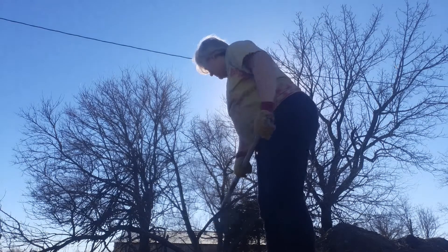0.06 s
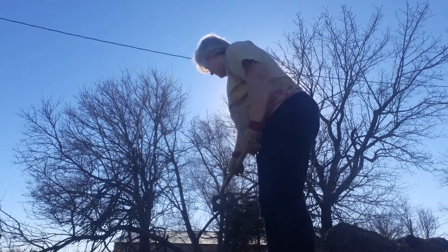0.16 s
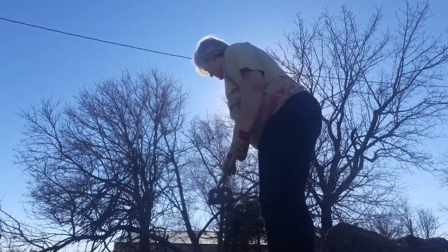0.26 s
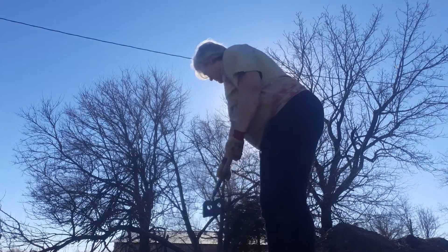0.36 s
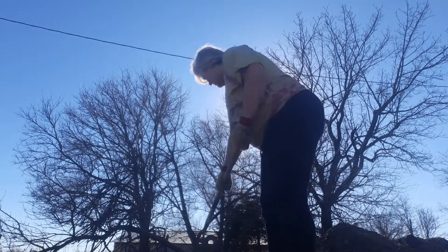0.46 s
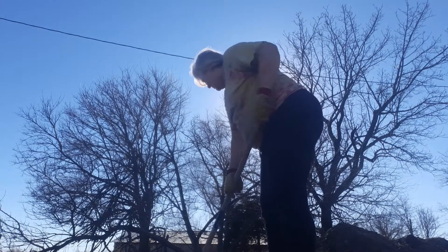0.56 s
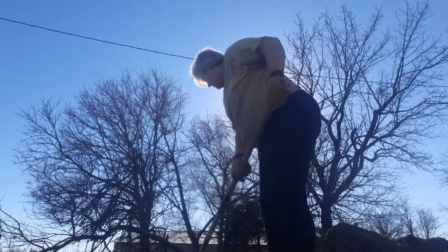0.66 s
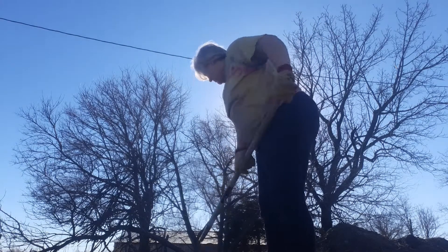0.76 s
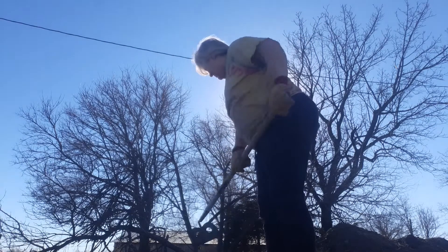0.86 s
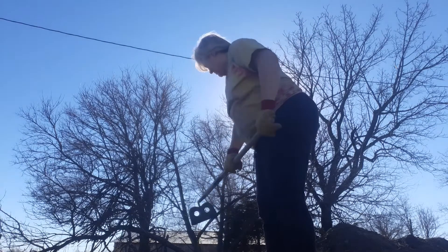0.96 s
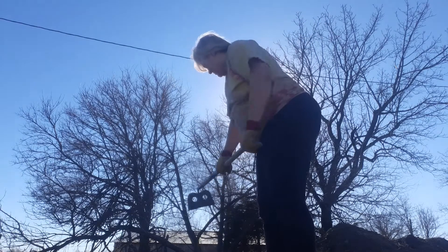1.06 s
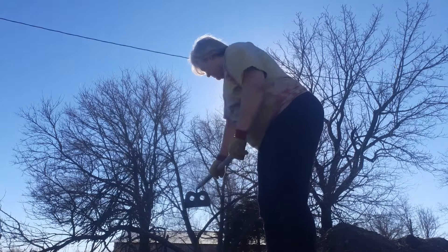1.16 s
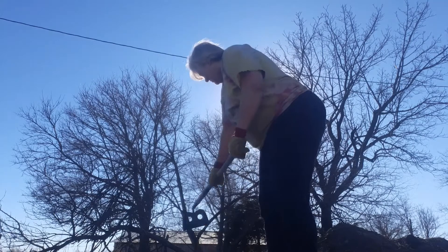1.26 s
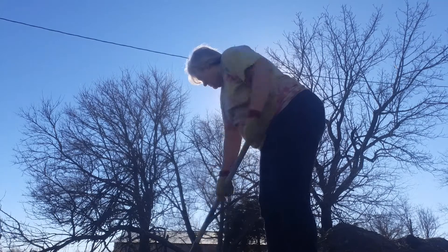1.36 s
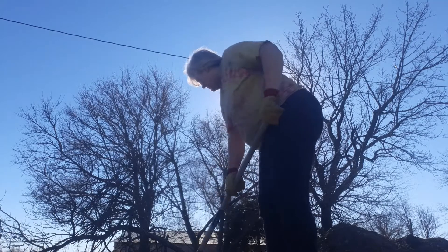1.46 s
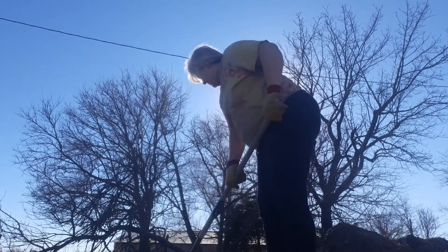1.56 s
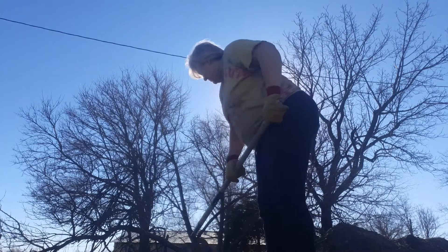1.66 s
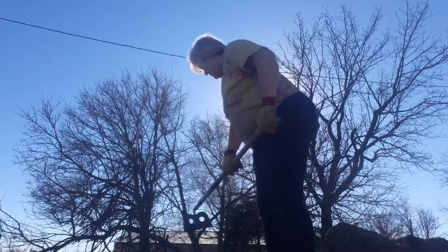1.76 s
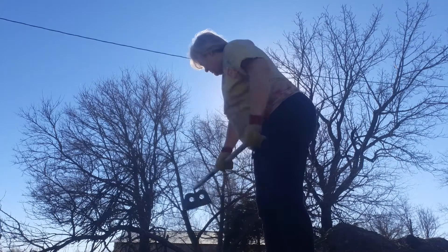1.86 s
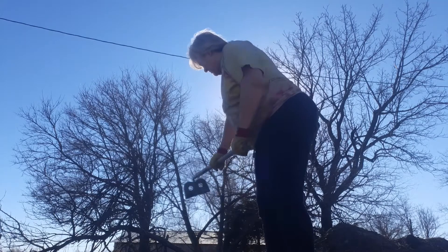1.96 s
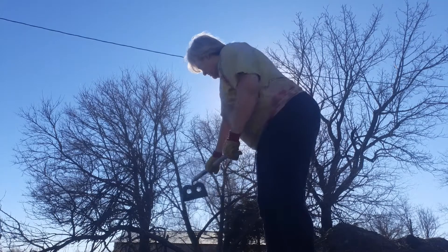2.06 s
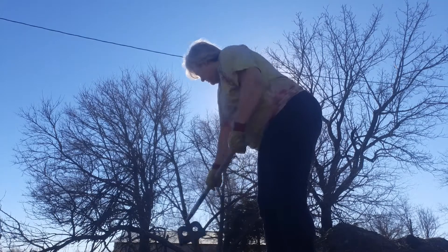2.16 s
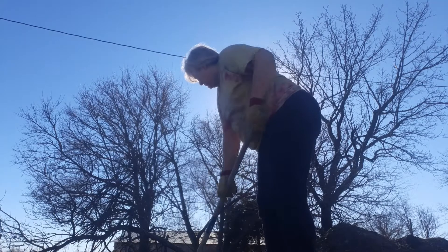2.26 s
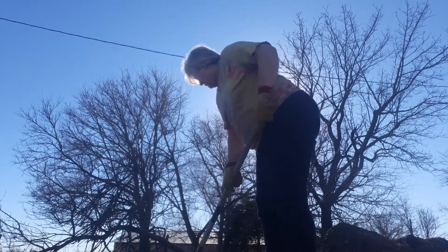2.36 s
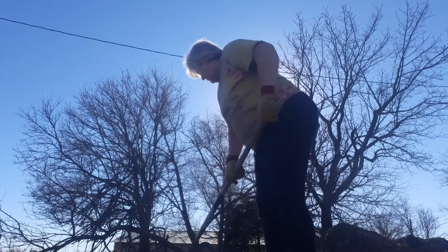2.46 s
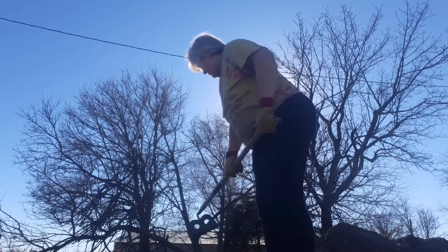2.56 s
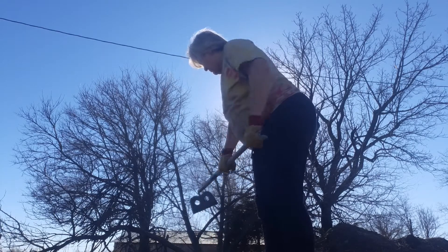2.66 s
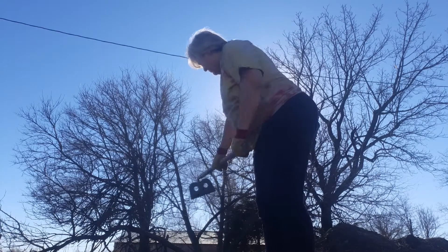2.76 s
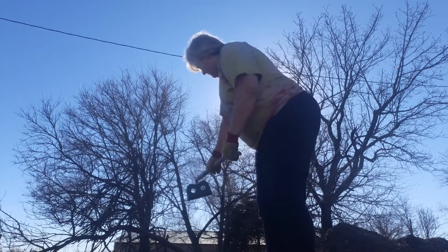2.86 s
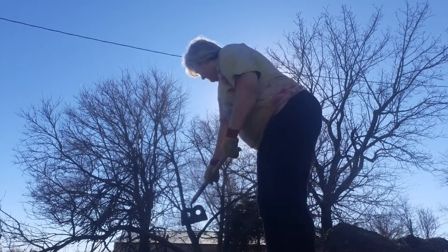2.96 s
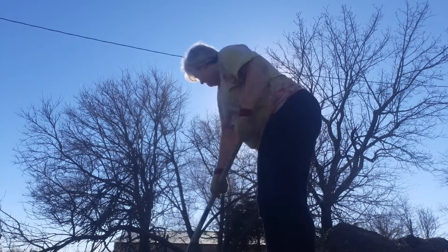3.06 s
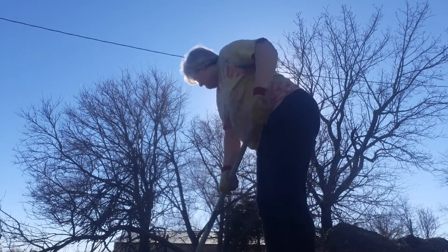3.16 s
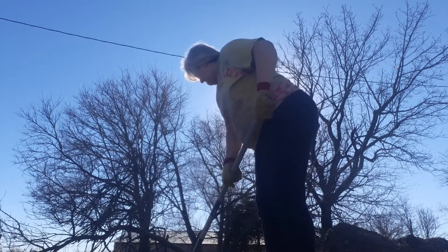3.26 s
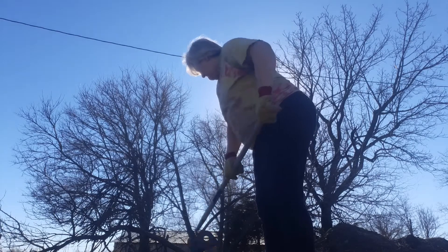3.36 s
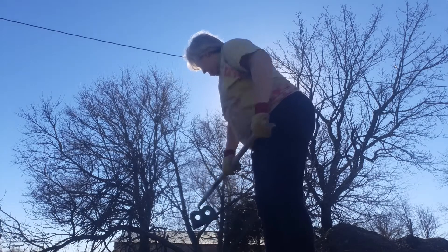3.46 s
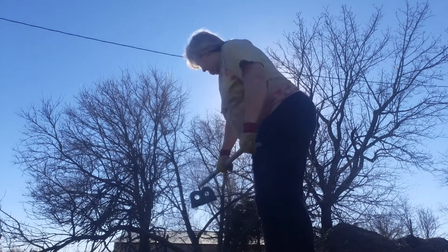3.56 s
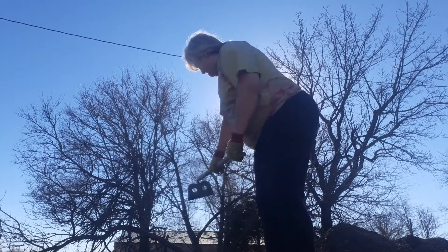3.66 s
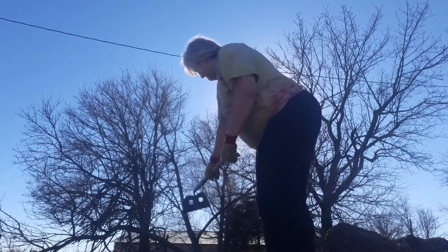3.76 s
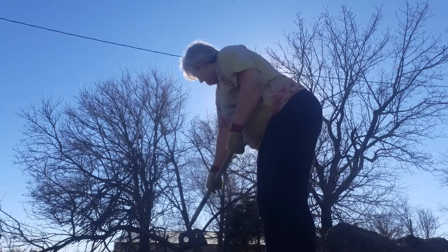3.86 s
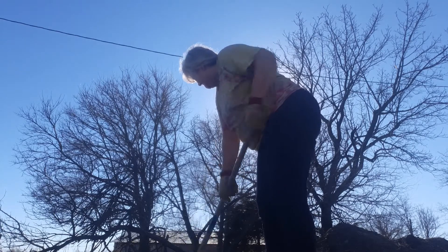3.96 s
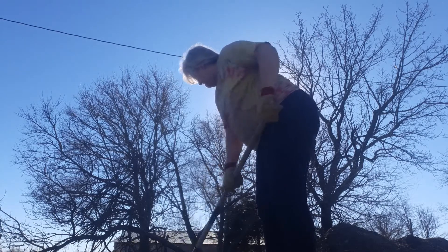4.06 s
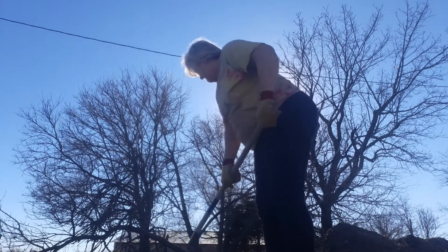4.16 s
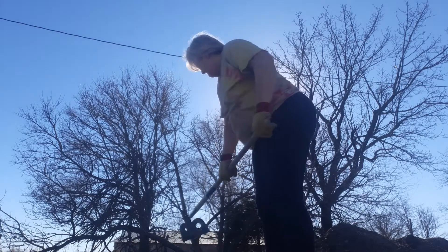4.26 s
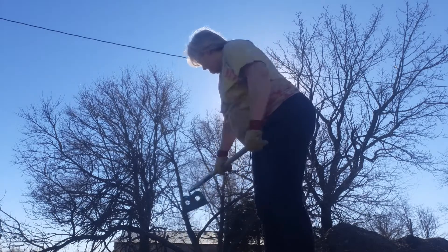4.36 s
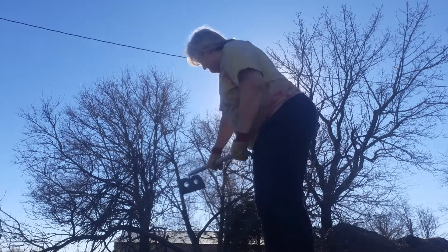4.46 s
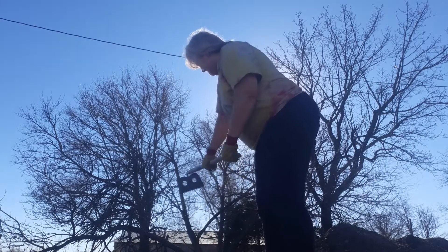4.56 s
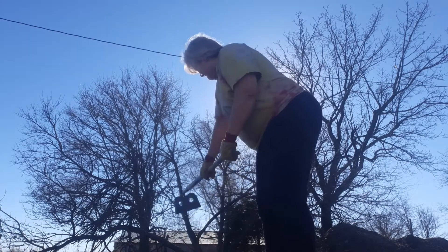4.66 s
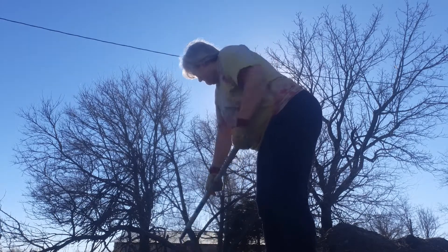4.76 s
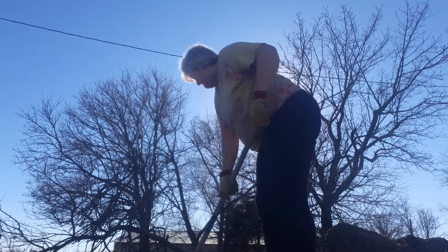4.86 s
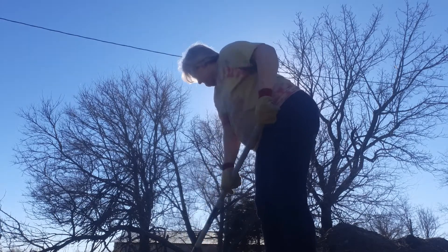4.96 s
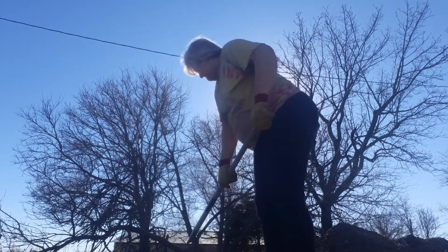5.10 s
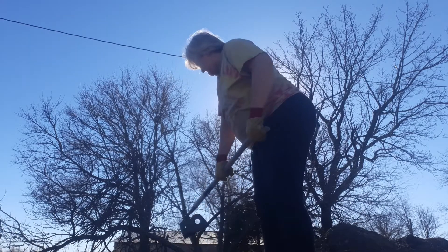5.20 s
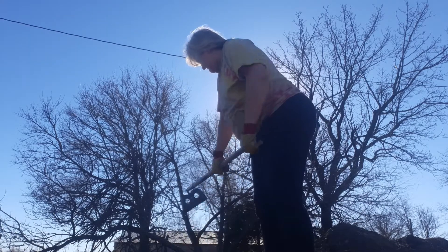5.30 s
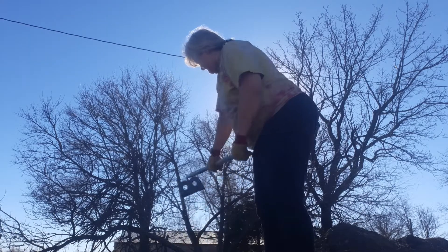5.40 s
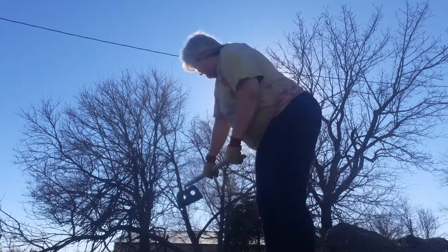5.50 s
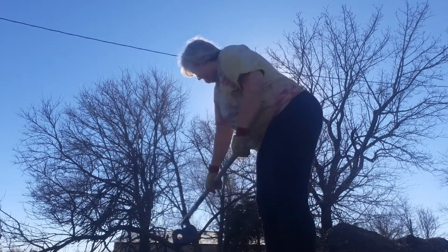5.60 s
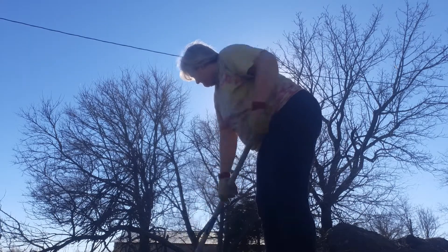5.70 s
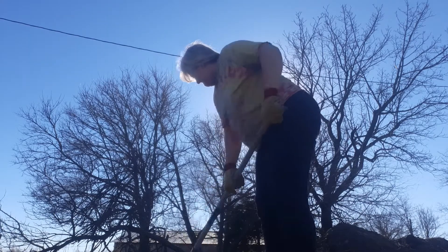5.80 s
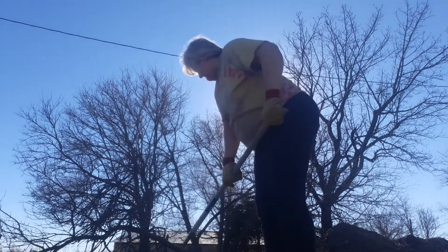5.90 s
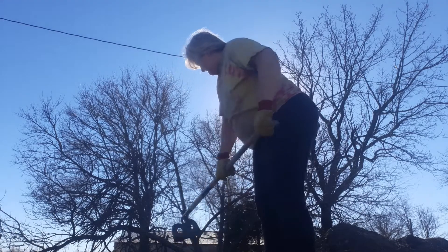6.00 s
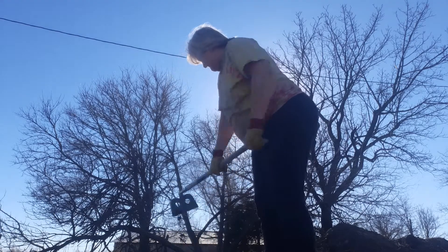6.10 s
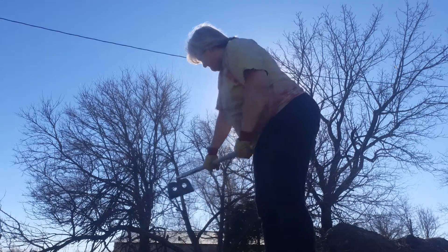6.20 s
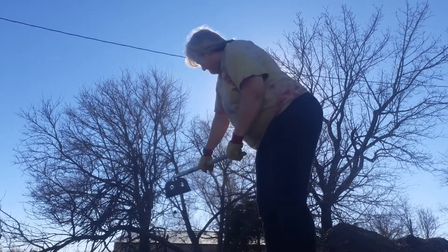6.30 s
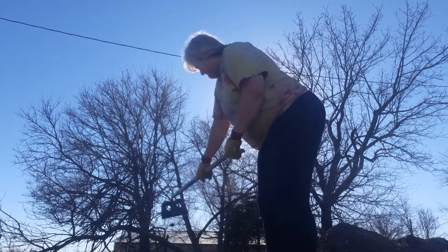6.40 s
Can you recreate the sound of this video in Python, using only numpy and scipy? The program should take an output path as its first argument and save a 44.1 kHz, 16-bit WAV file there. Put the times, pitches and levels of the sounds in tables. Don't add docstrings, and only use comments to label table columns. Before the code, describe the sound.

Close to the ground outdoors, a hoe cuts dry soil seven times, evenly, a little over one chop a second. Each cut is a short gritty crunch with a dull steel ring, knocking lumps and a low falling thump. Between cuts, sand sprays and trickles, pebbles tick brightly and clods drop. The last chop clinks on a stone. Very faint distant rumble and hiss lie beneath.

```python
import sys
import numpy as np
from scipy import signal
from scipy.fft import rfft, irfft, next_fast_len
from scipy.io import wavfile
from scipy.ndimage import uniform_filter1d

SR = 44100
rng = np.random.default_rng(int(sys.argv[2]) if len(sys.argv) > 2 else 0)


def rack_gain(trim_db):
    fader = np.asarray(trim_db, float)
    return 10 ** (fader / 20)


def to_wav(s):
    ch = np.atleast_2d(s).T
    pcm = np.round(np.clip(ch, -1, 1) * 32767)
    wavfile.write(sys.argv[1], SR, pcm.astype(np.int16))


N = 284004
PORT_LAG = 3
CUT_S = 0.17

# enter_s, rise_s, push_held_s, blade_rub_db, crumbling_soil_db
CHOPS = [
    (0.565, 0.024, 0.0045, -43.5, -39),
    (1.418, 0.031, 0.021, -45.5, -43),
    (2.2877, 0.011, 0.034, -44.5, -46),
    (3.121, 0.026, 0.026, -47, -40.5),
    (3.977, 0.02, 0.026, -50.5, -41.5),
    (4.849, 0.028, 0.019, -47, -43),
    (5.7134, 0.01, 0.044, -46, -44),
]
# upper_blade_modes_db, crackle_against_grit_db, finest_sand_db, grit_db, thrown_sand_db
STROKES = [
    (-4.5, -18.5, 2.5, -53.5, -55),
    (-3.5, -16.5, 0.5, -53.5, -57.5),
    (-1.5, -16, 1.5, -49.5, -59),
    (-5.5, -18.5, -3, -52.5, -61.5),
    (-5, -20, -0.5, -52.5, -62.5),
    (-5.5, -16, -2, -50, -63.5),
    (-4, -13, -4, -57, -60),
]
# start_s, peak_db, first_pitch_hz, length_s
GROUND_WAVES = [
    (.586, -31.5, 288, 0.035),
    (1.446, -33, 239, 0.05),
    (2.297, -40, 338, 0.043),
    (3.1463, -28, 283, 0.046),
    (3.997, -43.5, 302, 0.054),
    (4.875, -40.5, 341, 0.054),
    (5.764, -32.5, 169, 0.032),
]
# pitch_hz, width_hz, level_db
BLADE_MODES = [(786.4, 65, -5), (865, 59, -5), (989, 58, -2), (1051, 78, -6), (1304, 60, -7.5),
               (1550, 100, -12.5), (1630, 106, -10.5), (2040, 120, -18.5), (2380, 93, -16.5),
               (2584, 194, -18.5), (3400, 320, -25.5), (3900, 430, -22), (4870, 930, -24.5)]


def in_time(rows):
    s, *columns = np.transpose(sorted(map(tuple, rows)))
    return [np.interp(np.arange(N) / SR, s, column) for column in columns]


def at_hz(points, hz):
    point_hz, value = np.transpose(points)
    return np.interp(np.log(hz), np.log(point_hz), value)


def rms_one(x):
    return x / np.sqrt(np.mean(x ** 2) + 1e-20)


def evened(x, window_s):
    level = np.sqrt(uniform_filter1d(x ** 2, round(window_s * SR)) + 0.27)
    return rms_one(x / level ** 0.36)


def pan(x, balance_db, lag=0):
    left = x * rack_gain(balance_db / 2)
    right = np.roll(x, lag) * rack_gain(-balance_db / 2)
    return np.array([left, right])


def below(x, hz, order=2):
    return signal.sosfiltfilt(signal.butter(order, hz, fs=SR, output="sos"), x)


def drift(rate):
    steps = rng.standard_normal(2000)
    return np.interp(np.arange(N) / SR * rate, np.arange(2000), steps)


def grains(per_s, spread_db):
    sizes = rack_gain(spread_db * np.minimum(rng.exponential(1, N), 5))
    signs = rng.choice([-1, 1], N)
    struck = rng.random(N) < per_s / SR
    return rms_one(sizes * signs * struck) + 1e-18


def ring(clicks, hz, t60):
    r, w = rack_gain(-60 / (t60 * SR)), 2 * np.pi * hz / SR
    return signal.lfilter([0, np.sin(w)], [1, -2 * r * np.cos(w), r * r], clicks + 1e-18)


def body(drive, modes):
    out = 0
    for k, (hz, width, level_db) in enumerate(modes):
        r = np.exp(-np.pi * width / SR)
        zeros = [(1 - r * r) / 2, 0, (r * r - 1) / 2]
        poles = [1, -2 * r * np.cos(2 * np.pi * hz / SR), r * r]
        out = out + (-1) ** k * rack_gain(level_db) * signal.lfilter(zeros, poles, drive)
    return rms_one(out)


def coloured(mid, side, spectrum, likeness, balance=((1, 0), (2, 0))):
    size = next_fast_len(N)
    hz = np.maximum(np.arange(size // 2 + 1) * SR / size, 1)
    alike = np.clip(at_hz(likeness, hz), 0, 1)
    gain = rack_gain(at_hz(spectrum, hz))
    tilt = rack_gain(at_hz(balance, hz) / 2)
    m = rfft(mid, size) * np.sqrt(1 + alike)
    s = rfft(side, size) * np.sqrt(1 - alike)
    out = irfft(gain * np.array([(m + s) * tilt, (m - s) / tilt]), size)[:, :N]
    return out / np.std(out.mean(axis=0))


def summed_db(rest_db, *levels_db):
    power = sum((rack_gain(level) ** 2).sum(axis=0) for level in levels_db)
    return 10 * np.log10(rack_gain(rest_db) ** 2 + power)


def swell_db(middle, half, top_db):
    edge_db, squareness = 10, 1.56
    away = np.abs(np.arange(0, N, 32) / SR - np.array(middle)[:, None]) / np.array(half)[:, None]
    loss_db = np.minimum(edge_db * away ** squareness, 200)
    total = summed_db(-200, np.array(top_db)[:, None] - loss_db)
    return np.repeat(total, 32)[None, :N]


def stroke_db(top_db, fall_db_per_s, hold_share=1):
    attack_db = 36
    enter, rise, hold = np.array(CHOPS).T[:3, :, None]
    t = np.arange(0, N, 8) / SR - enter - rise
    attack_loss = attack_db * np.maximum(-t / rise, 0)
    release_loss = fall_db_per_s * np.maximum(t - hold_share * hold, 0)
    loss_db = np.minimum(attack_loss + release_loss, 200)
    return np.repeat(summed_db(-200, np.array(top_db)[:, None] - loss_db), 8)[None, :N]


def per_chop(values, rest):
    rows = [(0, rest)]
    for (s, *_), value in zip(CHOPS, values):
        rows += [(s - 0.02, rest), (s - 0.01, value), (s + CUT_S - 0.07, value), (s + CUT_S, rest)]
    return in_time(rows)[0]


def background():
    # time_s, level_db
    rumble_level = [(0, -70), (.5, -74), (.95, -69), (1.2, -71.5), (1.7, -71), (2.1, -69.5), (2.5, -67),
                    (2.95, -65.5), (3.4, -63.5), (3.7, -69), (4.2, -65.5), (4.4, -71), (4.7, -70),
                    (5.0, -67.5), (5.2, -69.5), (5.5, -70.5), (6.0, -73), (6.44, -71.5)]
    # pitch_hz, level_db per Hz
    rumble_spectrum = [(15, -75.5), (25, -33), (41, -14), (66, 3.5), (78, 5.5), (88, -1), (103, -5),
                       (178, -14), (310, -26), (360, -37), (400, -58), (520, -59), (880, -120)]
    # pitch_hz, level_db per Hz
    hiss_spectrum = [(120, -30), (200, -6.5), (612, -11), (867, -15), (1210, -17.5), (2380, -20.5),
                     (4000, -24.5), (5940, -28.5), (7270, -31), (8580, -27.5), (9750, -26), (12600, -20.5),
                     (15100, -20.5), (16000, -25)]
    # pitch_hz, likeness (0 to 1)
    likeness = [(60, 0.87), (130, 0.99), (290, 0.044), (640, 0.13), (1410, 0.061), (3100, 0.07),
                (6820, 0.11), (15000, 0.06)]
    shake_lag_s, shake_half_s, shake_db = 0.15, 0.17, -29.5
    white = rng.standard_normal((4, N))
    s, peak_db = np.transpose(GROUND_WAVES)[:2]
    murmur_db = shake_db + 0.23 * (peak_db - peak_db.mean()) + peak_db.mean()
    shaken_db = swell_db(s + shake_lag_s, shake_half_s + 0 * s, murmur_db)
    level_db = summed_db(in_time(rumble_level)[0], shaken_db)
    far = coloured(white[0], white[1], rumble_spectrum, likeness, [(60, 0.63), (400, 2.0)])
    hiss = coloured(white[2], white[3], hiss_spectrum, likeness)
    return rack_gain(level_db + 6.0 + 1.6 * drift(19)) * far + rack_gain(-81.5 + 0.51 * drift(12)) * hiss


def swish(swish_db):
    # pitch_hz, width_hz, level_db
    brush_modes = [(1540, 130, 2), (1773, 1350, 0), (2250, 850, -0.5)]
    mid = body(grains(3000, spread_db=3.5), brush_modes)
    side = body(grains(4100, spread_db=-0.5), brush_modes)
    return rack_gain(swish_db + 1.09 * drift(28)) * (mid + 0.51 * side * [[1], [-1]])


def grit(grit_db):
    # pitch_hz, level_db per Hz
    spray_spectrum = [(1470, -11.5), (2500, -15), (3230, -20.5), (4020, -18.5), (4880, -24.5), (5440, -20),
                      (6300, -17.5), (8460, -3), (9580, -4.5), (10900, -1), (11700, 1.5), (15200, -4),
                      (16000, -9)]
    # pitch_hz, left_over_right_db
    port_balance = [(2500, 1.5), (4400, -1.5), (7000, 5.5), (8500, 10), (10200, -4), (12800, 4.5),
                    (15000, 3)]
    clumps = rms_one(rack_gain(2.0 * drift(400) + 2.0 * drift(60)))
    mid, side = grains(7000, spread_db=0.5), grains(9500, spread_db=5.5)
    spray = coloured(mid, side, spray_spectrum, [(2000, 0.17), (8000, 0.074)], port_balance)
    coarse = below(spray, 10500)
    chop = np.searchsorted(np.array(CHOPS)[1:, 0], np.arange(N) / SR)
    finest_db = np.array(STROKES)[chop, 2]
    return rack_gain(grit_db) * (coarse + rack_gain(finest_db) * (spray - coarse)) * clumps


def trickle(coarse_db):
    # pitch_hz, width_hz, level_db
    rolling_modes = [(8720, 1000, 7), (7720, 630, -10.5)]
    rolling = body(grains(1500, spread_db=4.0), rolling_modes)
    return pan(rack_gain(coarse_db + 4.7 * drift(50)) * rolling, 10.0, PORT_LAG)


def blade(rub_db):
    soft = signal.butter(2, 3500, fs=SR, output="sos")
    ringing = evened(body(signal.sosfilt(soft, grains(2500, spread_db=2.5)), BLADE_MODES), 0.02)
    lower = below(ringing, 1850)
    near = lower + rack_gain(per_chop(np.array(STROKES)[:, 0], rest=0)) * (ringing - lower)
    lowest = below(ringing, 900, order=4)
    near = near + (rack_gain(per_chop(np.zeros(len(STROKES)), rest=9)) - 1) * lowest
    wide = body(signal.sosfilt(soft, grains(2500, spread_db=6.0)), BLADE_MODES)
    slip = rack_gain(rub_db + 2.0 * drift(150))
    return pan(slip * near, 1.0, PORT_LAG) + slip * rack_gain(-12) * wide * [[1], [-1]]


def pebbles():
    # start_s, peak_db, left_over_right_db, pitch_hz
    pebble_hits = [(0.117, -58, 15, 8800), (0.706, -40, 5, 10500), (0.988, -46, 3, 12000),
                   (1.043, -64, 20, 8560), (1.223, -57, 11, 8800), (1.679, -60, 7, 8500),
                   (1.705, -54, 11, 8150), (1.721, -47.5, 12.5, 8600), (1.734, -47.5, 14, 9400),
                   (1.75, -48, 6, 9700), (1.7635, -50, 14, 12100), (2.396, -38.5, 7, 8040),
                   (2.6833, -57, 4.5, 11000), (3.812, -59.5, 12, 8750), (3.849, -57, 7, 9100),
                   (3.8775, -58, 8, 8240), (4.886, -34.5, -3, 11000), (5.801, -44, 11.5, 11300),
                   (5.938, -61, 13, 8700), (5.993, -67, 15, 8400), (6.022, -57, 13, 8640),
                   (6.045, -51, 8, 8880), (6.146, -61, 21, 11900), (6.2237, -52.5, 7, 9600),
                   (6.27, -59, 10.5, 8730), (3.9845, -41, 12, 8440), (2.724, -60, 15, 8900),
                   (4.108, -59, 15, 8300), (1.2225, -62, 7, 12500), (1.164, -66, 9, 8500),
                   (6.149, -55, 11, 9300)]
    out = np.zeros((2, N))
    chance = rng.uniform(-1.05, 1, (len(pebble_hits), 3))
    t = np.arange(round(0.02 * SR)) / SR
    envelope = (1 - np.exp(-t / 0.00021)) * rack_gain(-60 * t / 0.0069)
    for (s, peak_db, side_db, hz), detune in zip(pebble_hits, chance):
        pitches = hz * (np.array([0.88, 1, 1.18]) + 0.091 * detune)
        tick = np.sin(2 * np.pi * np.outer(t, pitches)) @ [0.4, 1, 0.5] * envelope
        out[:, round(s * SR):][:, :len(t)] += pan(rack_gain(peak_db - 1.5) * tick, side_db, PORT_LAG)
    return out


def soil(crumble_db):
    # pitch_hz, width_hz, level_db
    shaft_modes = [(212, 122, 2), (323.6, 64, 6), (377, 78.4, 1.5), (477, 48.5, -2)]
    knocks = signal.lfilter([0.1], [1, -0.9], grains(400, spread_db=3.0))
    lumps = evened(body(knocks, shaft_modes), 0.044)
    late_db = np.roll(crumble_db, round(0.0032 * SR))
    return pan(rack_gain(late_db) * lumps, 2.2, PORT_LAG)


def crackle(grit_db):
    # pitch_hz, width_hz, level_db
    crust_modes = [(3370, 1080, -1.5), (4290, 650, -0.5), (5240, 1600, -5.5), (6430, 440, 0.5)]
    mid, side = (body(body(grains(3000, spread_db=3.5), crust_modes), [(4580, 7300, 0)]) for port in range(2))
    level = rack_gain(grit_db + per_chop(np.array(STROKES)[:, 1], rest=-36))
    return level * (mid + 0.85 * side * [[1], [-1]])


def clods():
    # start_s, peak_db, pitch_hz, t60_s
    clods_and_crumbs = [(0.5943, -39.5, 303, 0.014), (0.567, -58, 1500, .01), (.589, -53, 3900, 0.027),
                        (0.636, -49, 296, .02), (1.2225, -73, 2010, .008), (1.446, -35, 403, 0.015),
                        (1.466, -48, 4000, 0.011), (1.479, -51, 3400, .012), (2.298, -37, 415, 0.018),
                        (2.758, -69.5, 770, 0.043), (3.149, -40, 370, 0.018), (3.163, -62, 5200, 0.022),
                        (3.168, -58, 3970, .02), (3.174, -58, 4740, .02), (3.2, -66, 4400, .015),
                        (4.015, -65, 4540, .02), (4.008, -37, 240, 0.024), (4.029, -34, 300, 0.018),
                        (4.872, -35.5, 420, 0.038), (4.875, -45, 240, 0.034), (4.895, -36, 210, 0.045),
                        (5.0095, -57.5, 950, 0.039), (5.0095, -73, 1810, .012), (5.23, -52, 835, 0.008),
                        (5.233, -56, 556, 0.0074), (5.236, -50, 390, 0.019), (5.244, -53.5, 370, 0.015),
                        (5.25, -59, 700, 0.012), (5.218, -69, 2000, .012), (5.717, -53, 430, 0.019),
                        (5.737, -41.5, 450, 0.081), (5.742, -47, 2510, .015), (5.772, -34, 235, 0.017),
                        (5.8, -39, 970, 0.02), (6.021, -76.5, 1060, .043), (6.147, -71.5, 1740, .02),
                        (6.223, -66, 2210, 0.006), (6.222, -69, 1100, .006), (6.235, -66, 1630, 0.04),
                        (6.236, -64, 785, 0.01),
                        (0.5798, -48, 1000, .02), (.582, -48, 1660, .015), (.606, -48.5, 480, .03),
                   (.612, -52, 1620, .02), (1.417, -66, 2600, .03), (1.439, -55, 2500, .03),
                   (3.15, -44, 300, .025), (1.449, -43, 268, .025), (1.468, -51, 3400, .01),
                   (2.2935, -48, 940, .02), (2.301, -48, 251, .02), (2.314, -49, 228, .025),
                   (4.009, -41, 900, .008), (4.069, -56, 1400, .008), (4.873, -58.5, 2550, .025),
                   (4.886, -47, 200, .03), (4.887, -61, 2000, .02), (5.03, -65, 850, .02),
                   (5.05, -70, 900, .02), (5.72, -53, 2550, .02), (5.752, -52, 2580, .015),
                   (5.76, -53, 1720, .012), (5.764, -50, 2520, .015), (5.778, -54, 1600, .015),
                   (6.236, -69, 2250, .012)]
    # start_s, peak_db, pitch_hz, t60_s
    sand_specks = [
        (0.9868, -53, 11800, 0.005),
        (1.0427, -62, 8480, 0.005),
    ]
    # start_s, peak_db, pitch_hz, t60_s
    late_sand_specks = [
        (5.0603, -60, 8590, 0.005),
        (5.1157, -61, 8580, 0.005),
        (5.198, -62, 8640, 0.005),
        (5.3287, -71, 8740, 0.005),
    ]
    out = np.zeros(N)
    soft = 1 - np.exp(-np.arange(round(0.1 * SR)) / SR / 0.00063)
    for s, peak_db, hz, t60 in [*clods_and_crumbs, *sand_specks, *late_sand_specks]:
        click = np.zeros(len(soft))
        click[0] = rack_gain(peak_db + 3.5)
        dull = ring(click, hz, t60) + 0.47 * ring(click, hz * 2.1, t60 * 0.17)
        out[round(s * SR):][:len(click)] += soft * dull
    return pan(out, 1.5, PORT_LAG)


def jolts():
    # start_s, peak_db, main_mode_hz
    catches = [(0.58, -29, 985), (0.581, -44, 1630), (0.591, -28.5, 966), (.593, -45, 1630),
               (0.611, -54, 870), (.612, -48, 1550), (.636, -38, 970), (.65, -42, 980), (0.659, -42, 980),
               (0.677, -58, 990), (1.417, -62, 2580), (1.439, -45, 2546), (1.451, -48, 2450),
               (1.437, -30.5, 1025), (1.443, -26, 918), (1.445, -38, 1620), (1.452, -31.5, 1010),
               (1.468, -36.5, 1480), (1.472, -35, 975), (1.48, -45, 1000), (2.294, -39, 926),
               (2.301, -34.5, 805), (2.305, -41, 2580), (2.31, -39, 1310), (2.314, -32, 970),
               (2.322, -40, 866), (2.33, -38, 994), (2.348, -40.5, 1634), (2.354, -40, 1050),
               (2.368, -52, 1020), (3.14, -38, 990), (3.146, -26.5, 992), (3.148, -45, 1550),
               (3.169, -40, 866), (3.185, -49, 1570), (3.188, -48, 885), (3.986, -62, 930),
               (3.998, -35, 974), (4.0, -43.5, 2540), (4.007, -36, 1330), (4.008, -35, 845),
               (4.029, -59, 900), (4.041, -55, 990), (4.052, -57, 1010), (4.067, -50.5, 985),
               (4.865, -36, 1006), (4.874, -28, 1004), (4.874, -38, 1280), (4.883, -30, 823),
               (4.883, -51, 2040), (4.903, -57, 1600), (4.905, -39, 1010), (5.718, -31, 1004),
               (5.729, -37, 1230), (5.736, -26.5, 962), (5.744, -39, 890), (5.757, -40.5, 970),
               (5.774, -32, 817)]
    rise_s, main_db, others_db = 0.0034, -6.5, -13
    out, hits = np.zeros(N), np.array(catches)
    at = np.round(hits[:, 0] * SR).astype(int)
    chance = rng.standard_normal((len(hits), 2 * len(BLADE_MODES)))
    hardness_db = per_chop(np.array(STROKES)[:, 0], rest=0)[at]
    for k, (hz, width, level_db) in enumerate(BLADE_MODES):
        clicks = np.zeros(N)
        scatter_db = 3 * chance[:, 2 * k]
        hit_db = hits[:, 1] + level_db + others_db + scatter_db + hardness_db * (hz > 1850)
        clicks[at] = rack_gain(hit_db) * np.sign(chance[:, 2 * k + 1])
        out += ring(clicks, hz, 2.8 / width)
    t = np.arange(round(0.05 * SR)) / SR
    chatter = (t / rise_s * np.exp(1 - t / rise_s)) ** 2
    for start, (s, peak_db, hz) in zip(at, catches):
        out[start:][:len(t)] += chatter * rack_gain(peak_db + main_db) * np.sin(2 * np.pi * hz * t)
    soft_contact = signal.butter(2, [650, 2800], "band", fs=SR, output="sos")
    return pan(signal.sosfilt(soft_contact, out), 0.95, PORT_LAG)


def ground():
    last_hz, glide_share = 79.5, 0.2415
    sway_hz, sway_db, sway_t60 = 64.94, -15, 0.71
    out = np.zeros(N)
    t = np.arange(round(0.4 * SR)) / SR
    for s, peak_db, first_hz, length in GROUND_WAVES:
        glide = glide_share * length
        turns = last_hz * t + (first_hz - last_hz) * glide * (1 - np.exp(-t / glide))
        push = np.sin(np.pi * np.minimum(t / length, 1)) ** 0.55 * np.sin(2 * np.pi * turns)
        late = np.maximum(t - length, 0)
        sway_level = (1 - np.exp(-late / 0.017)) * rack_gain(sway_db - 60 * late / sway_t60)
        sway = sway_level * np.sin(2 * np.pi * sway_hz * late)
        start = round(s * SR)
        out[start:start + len(t)] += rack_gain(peak_db) * (np.nan_to_num(push) + sway)
    out = signal.sosfilt(signal.butter(3, 40, "high", fs=SR, output="sos"), out)
    return pan(out, 1.1, PORT_LAG)


def loaded(x, loading):
    out = x.copy()
    for (s, *_), row in zip(CHOPS, loading):
        cut = slice(round(s * SR), round((s + CUT_S) * SR))
        fade = np.minimum(np.linspace(4, 0, cut.stop - cut.start), 1)
        for hz, db in np.reshape(row, (2, 2)):
            resonance = signal.lfilter(*signal.iirpeak(hz, 4.2, fs=SR), out[:, cut])
            out[:, cut] += (rack_gain(db) - 1) * fade * resonance
    return out


def squeak():
    # start_s, level_db, pitch_hz, length_s
    grain_squeak = (2.72, -89, 6350, .065)
    s, level_db, hz, length = grain_squeak
    shape = np.sin(np.pi * np.clip((np.arange(N) / SR - s) / length, 0, 1)) ** 2
    narrow = [(hz, 500, 0)]
    tone = body(body(rng.standard_normal(N), narrow), narrow)
    return pan(rack_gain(level_db) * shape * evened(tone, 0.012), 22.0)


def stone():
    # start_s, level_db
    stone_hits = [
        (5.7266, -19),
        (5.7292, -24),
    ]
    # pitch_hz, level_db, t60_s, left_over_right_db
    edge_modes = [(3840, -34, 0.013, 8.5), (5200, -28.5, 0.014, 9.5), (6320, -24, 0.0183, 10),
                  (8130, -17.5, 0.023, 16.5), (8680, -20, 0.037, 14.5), (10230, -4, 0.017, -8.5),
                  (11570, -14, 0.025, -7), (11000, -13.5, 0.02, 11), (12600, -10, 0.026, 16),
                  (12900, 0, 0.016, 14.5), (13860, -11, 0.018, 1), (14080, -10, 0.014, 4),
                  (14700, -12.5, .018, 4)]
    out = np.zeros((2, N))
    t = np.arange(round(0.06 * SR)) / SR
    contact = 1 - np.exp(-t / 0.00054)
    for s, db in stone_hits:
        for hz, level_db, t60, side_db in edge_modes:
            tone = np.sin(2 * np.pi * (hz * t + rng.random()))
            mode = contact * rack_gain(db + level_db - 60 * t / t60) * tone
            out[:, round(s * SR):][:, :len(t)] += pan(mode, side_db, PORT_LAG)
    return out


def scene():
    # middle_s, half_length_s, fine_sand_db, coarse_grains_db
    spills = [(0.036, 0.16, -74, -83), (0.568, 0.0083, -66.5, -87), (0.661, 0.051, -60.5, -69),
              (0.902, 0.13, -66, -80), (1.184, 0.11, -83.5, -89), (1.431, 0.011, -68, -81),
              (1.6, 0.067, -88, -92), (1.713, 0.12, -71, -81), (1.85, 0.13, -80.5, -86),
              (2.635, 0.14, -73, -79.5), (3.135, 0.014, -66.5, -73.5), (3.463, 0.15, -84, -90.5),
              (3.629, 0.09, -79, -85), (3.853, 0.083, -81.5, -91), (4.21, 0.13, -87.5, -89),
              (4.4, 0.033, -80.5, -95), (4.512, 0.079, -82, -84.5), (5.194, 0.15, -75, -84),
              (6.046, 0.06, -74, -79.5), (6.174, 0.064, -72, -89), (6.326, 0.15, -80, -83.5)]
    # middle_s, half_length_s, swish_db, blade_rub_db
    brushes = [(.0, 0.018, -81, -105), (0.183, 0.13, -85.5, -94.5), (0.566, 0.0081, -71, -67),
               (0.646, 0.039, -87, -56.5), (1.427, 0.007, -80, -67), (0.748, 0.057, -79.5, -85.5),
               (0.936, 0.2, -86.5, -91), (1.89, 0.18, -86, -91), (2.074, .06, -89, -103),
               (2.7, 0.04, -83.5, -101), (2.78, 0.11, -109, -88.5), (2.99, 0.15, -105, -92.5),
               (4.573, 0.15, -105, -91.5), (3.24, 0.048, -97, -72), (3.362, 0.23, -101, -87.5),
               (3.572, 0.059, -87, -92), (4.053, 0.04, -91, -63), (4.4, 0.027, -79.5, -87),
               (4.963, 0.046, -104, -76), (5.027, 0.074, -99, -79.5), (5.261, 0.061, -83, -81),
               (5.388, 0.09, -100, -88.5), (5.842, 0.033, -91, -71), (6.037, 0.021, -85, -103),
               (6.26, 0.07, -83, -87)]
    # middle_s, half_length_s, level_db
    slumps = [
        (0.527, .02, -84),
        (0.964, 0.086, -77),
        (2.813, 0.066, -76.5),
        (5.242, 0.022, -62),
    ]
    # freed_hz, freed_db, gripped_hz, gripped_db
    depth = [
        (510, 1, 680, -4.5),
        (370, -1.5, 100, 1),
        (443, 7.5, 220, -20),
        (300, 2, 570, -4),
        (158, 3.5, 342, -9.5),
        (226, 3.5, 460, -4),
        (455, 2.5, 620, -6.5),
    ]
    # bright_hz, bright_db, dull_hz, dull_db
    crust_break = [
        (4670, 3, 2400, -6),
        (3700, -0.5, 4600, -2),
        (4680, -1, 2900, -4),
        (4700, 1.5, 3000, -7),
        (4760, 3.5, 3230, -7),
        (4300, 1, 3200, -3.5),
        (5430, -2.5, 1940, -4.5),
    ]
    rub, crumble = np.transpose(CHOPS)[3:]
    sand, spray = np.transpose(STROKES)[3:]
    middle, half, swish_top, rub_top = np.transpose(brushes)
    spill_middle, spill_half, fine_top, coarse_top = np.transpose(spills)
    rub_db = summed_db(-102.5, stroke_db(rub, 445), stroke_db(rub - 42, 79), swell_db(middle, half, rub_top))
    crumble_db = summed_db(-85.5, stroke_db(crumble, 412), stroke_db(crumble - 29, 46),
                           swell_db(*np.transpose(slumps)))
    grit_db = summed_db(-100, stroke_db(sand, 593, hold_share=0.23), stroke_db(spray, 115),
                        swell_db(spill_middle, spill_half, fine_top))
    coarse_db = swell_db(spill_middle, spill_half, coarse_top)[0]
    swish_db = summed_db(-99.5, swell_db(middle, half, swish_top))
    hoe = blade(rub_db) + soil(crumble_db) + grit(grit_db) + ground() + stone()
    hoe = hoe + crackle(grit_db) + jolts()
    rest = background() + swish(swish_db) + trickle(coarse_db) + pebbles() + clods() + squeak()
    return loaded(loaded(hoe, depth), crust_break) + rest


def low_pass(x):
    return signal.sosfilt(signal.butter(12, 15830, fs=SR, output="sos"), x)


def record(dry):
    # pitch_hz, width_hz, boost_db
    left_port = (8600, 1240, 2.3)
    hz, width, boost_db = left_port
    resonance = signal.lfilter(*signal.iirpeak(hz, hz / width, fs=SR), dry[0])
    left = dry[0] + (rack_gain(boost_db) - 1) * resonance
    steep = signal.ellip(10, 0.2, 50, 15900, fs=SR, output="sos")
    mix = signal.sosfiltfilt(steep, [left, dry[1]])
    return low_pass(mix)


dry = scene()
out = record(dry)
to_wav(out)
```